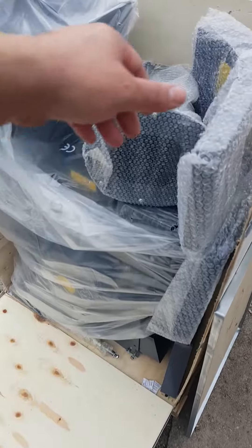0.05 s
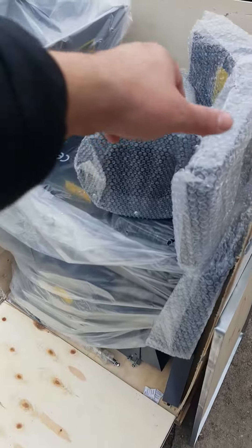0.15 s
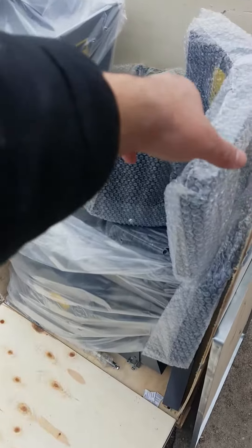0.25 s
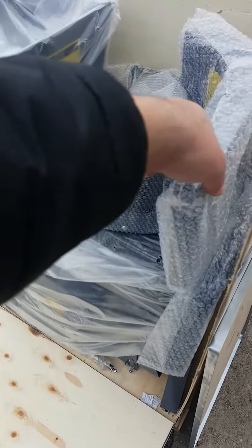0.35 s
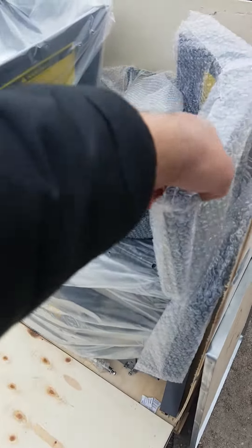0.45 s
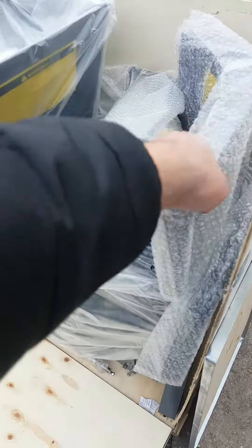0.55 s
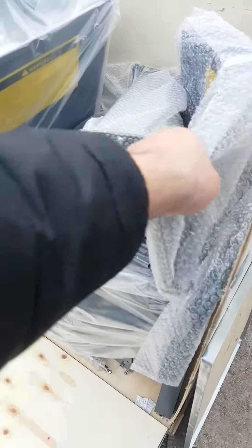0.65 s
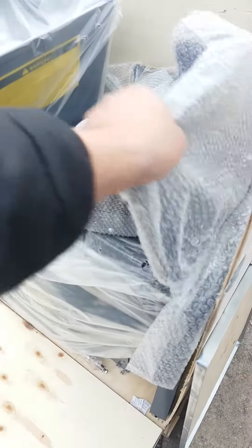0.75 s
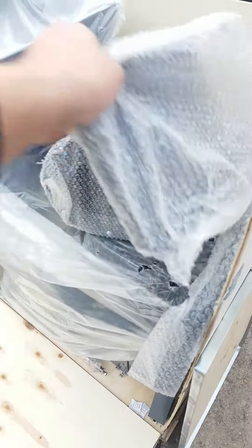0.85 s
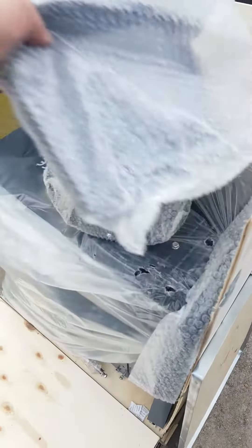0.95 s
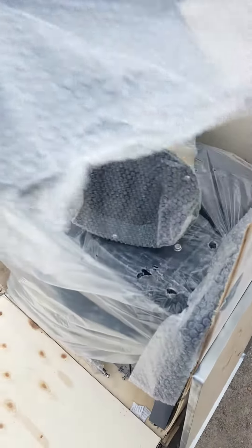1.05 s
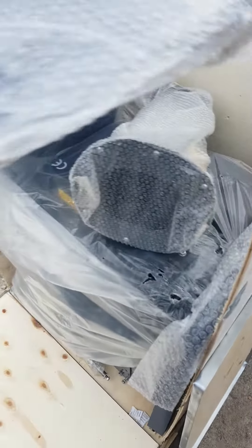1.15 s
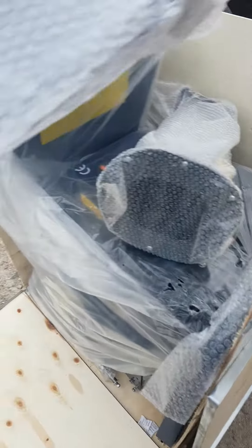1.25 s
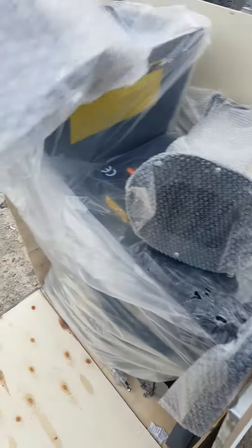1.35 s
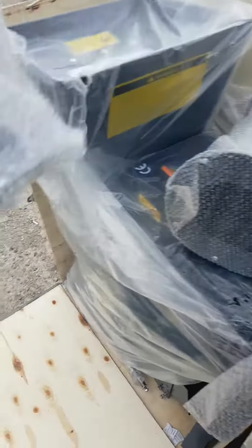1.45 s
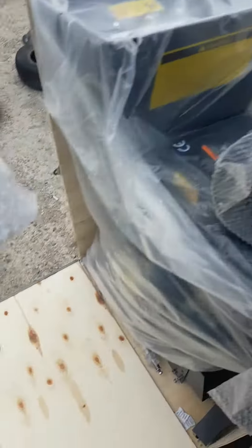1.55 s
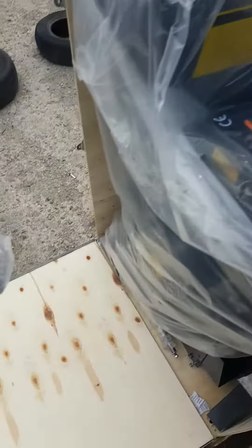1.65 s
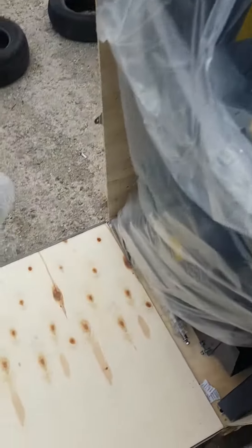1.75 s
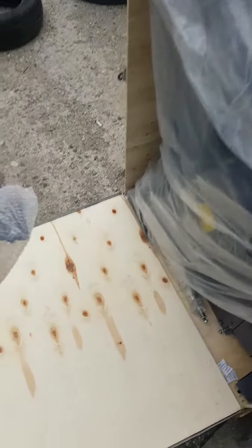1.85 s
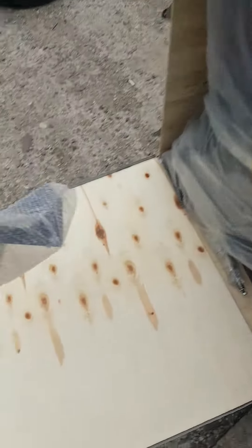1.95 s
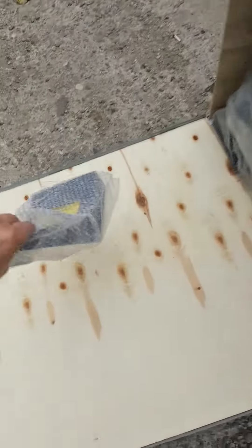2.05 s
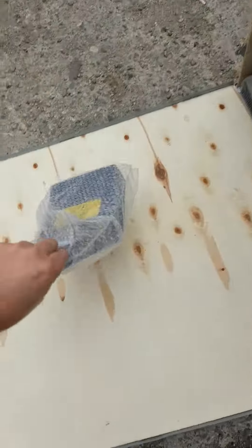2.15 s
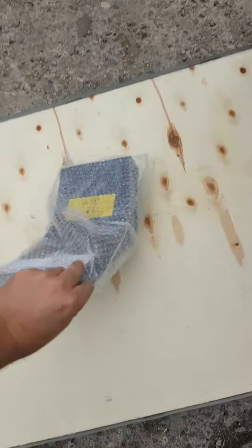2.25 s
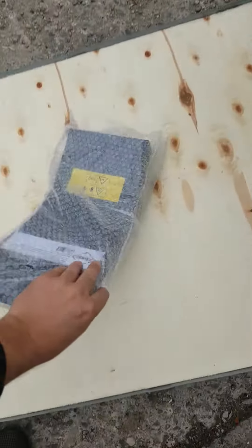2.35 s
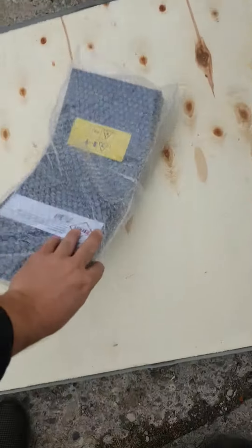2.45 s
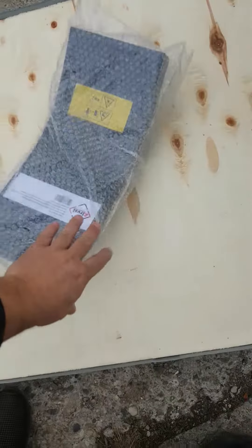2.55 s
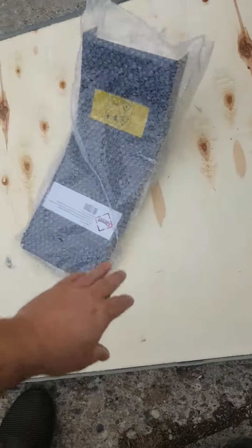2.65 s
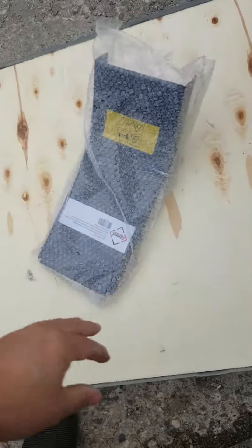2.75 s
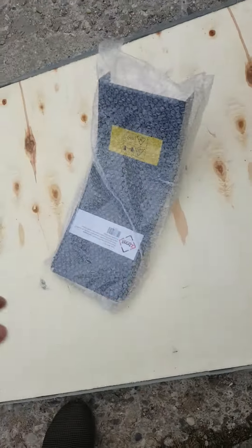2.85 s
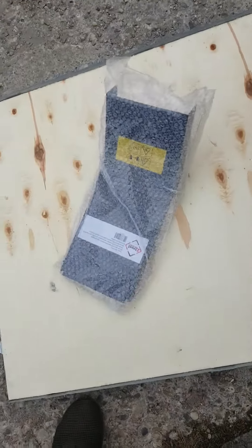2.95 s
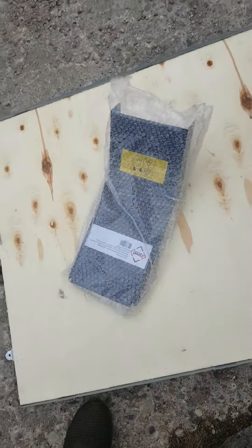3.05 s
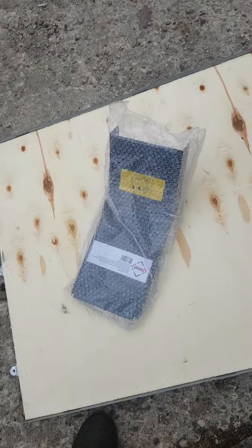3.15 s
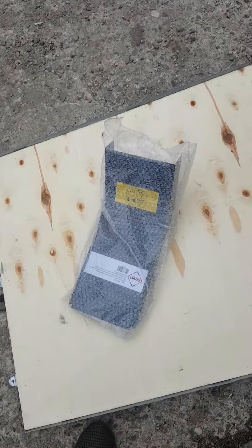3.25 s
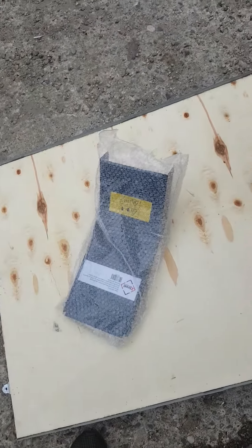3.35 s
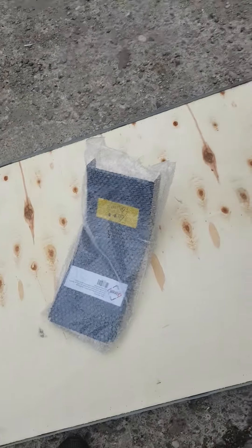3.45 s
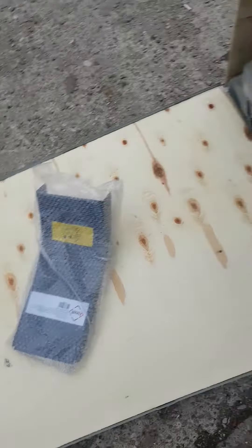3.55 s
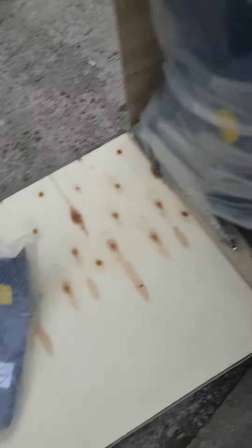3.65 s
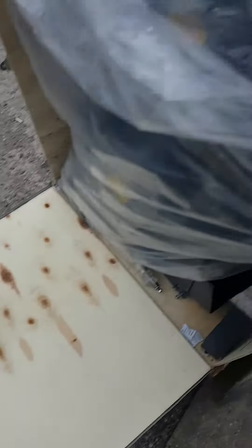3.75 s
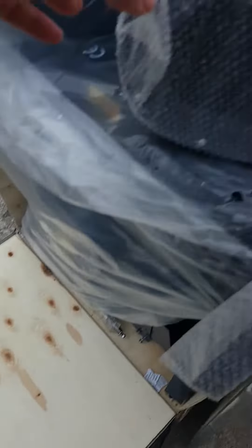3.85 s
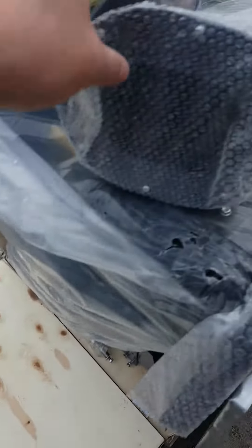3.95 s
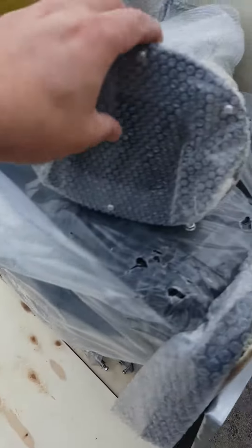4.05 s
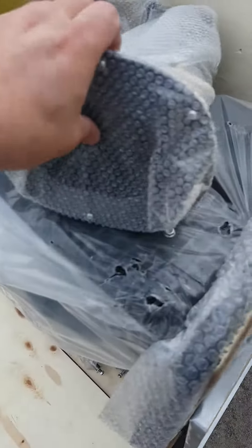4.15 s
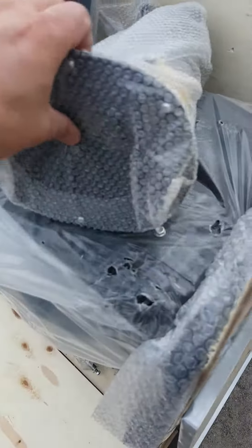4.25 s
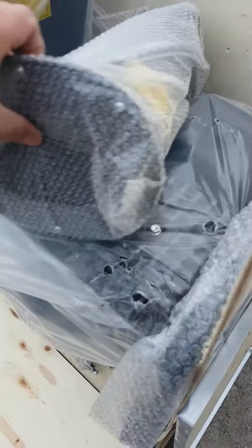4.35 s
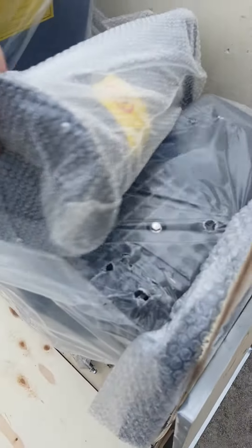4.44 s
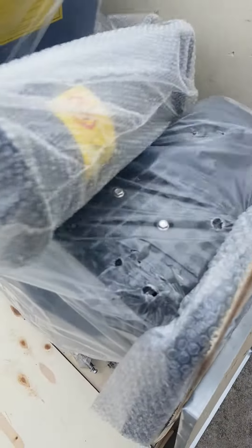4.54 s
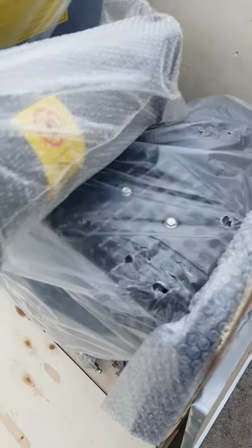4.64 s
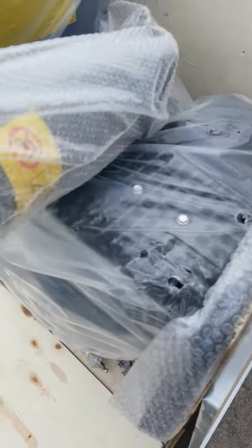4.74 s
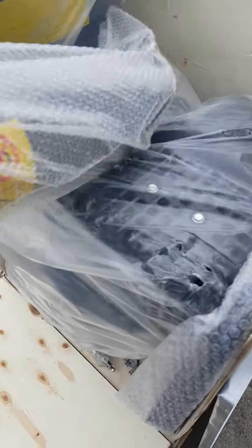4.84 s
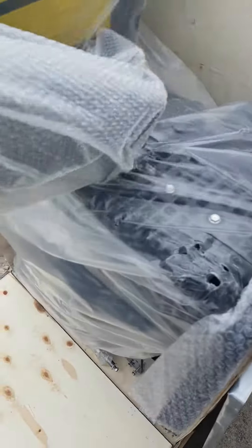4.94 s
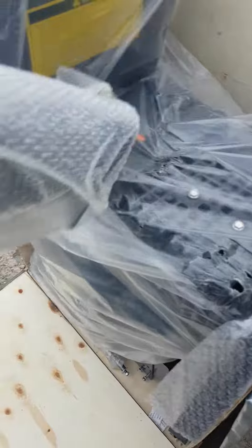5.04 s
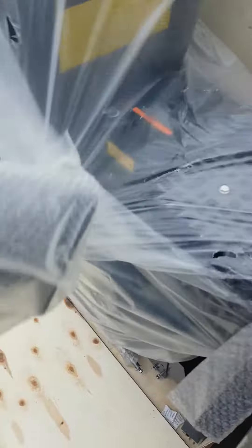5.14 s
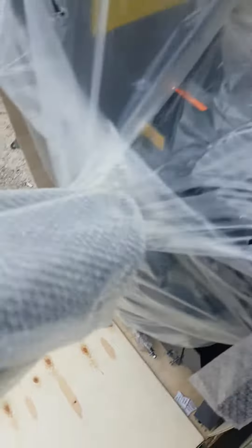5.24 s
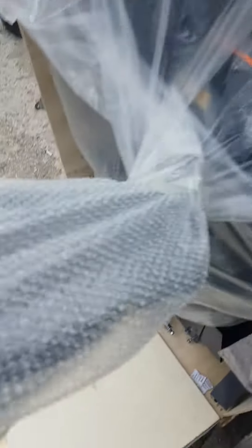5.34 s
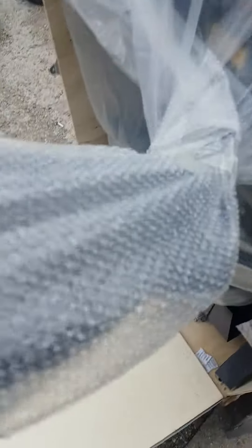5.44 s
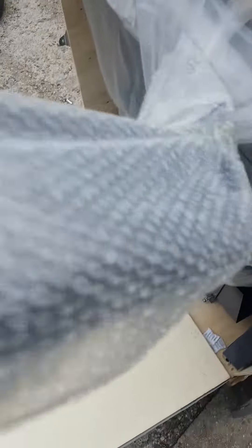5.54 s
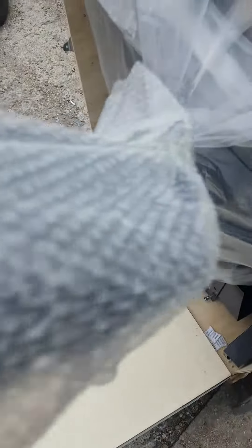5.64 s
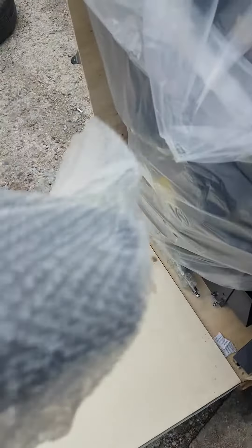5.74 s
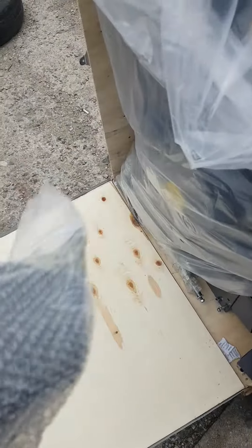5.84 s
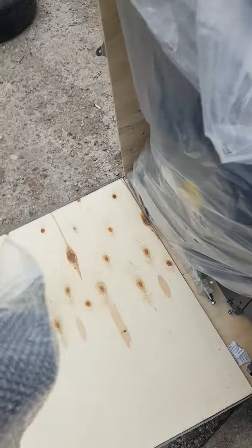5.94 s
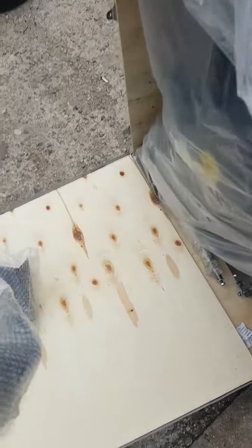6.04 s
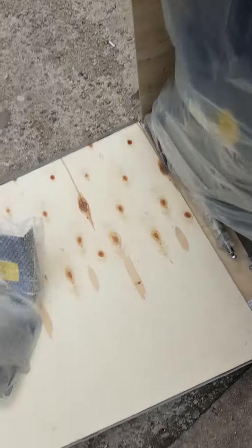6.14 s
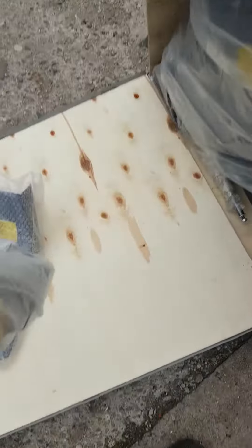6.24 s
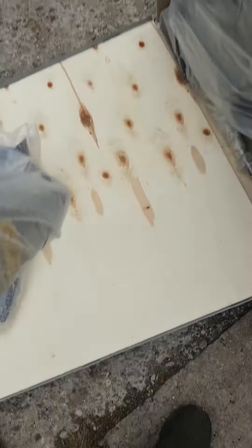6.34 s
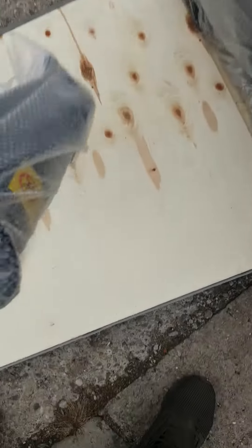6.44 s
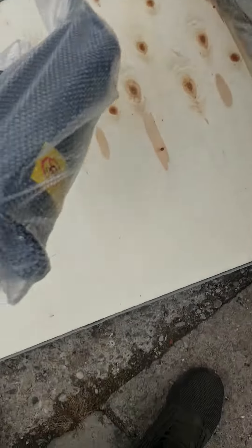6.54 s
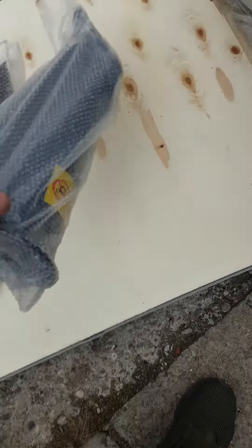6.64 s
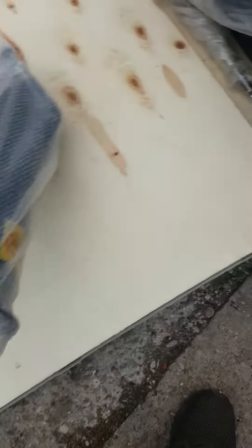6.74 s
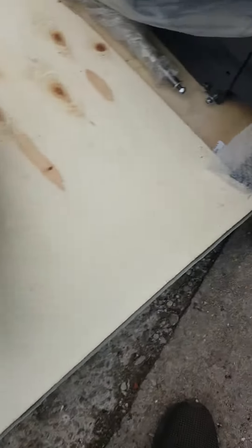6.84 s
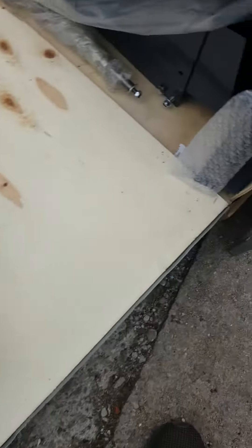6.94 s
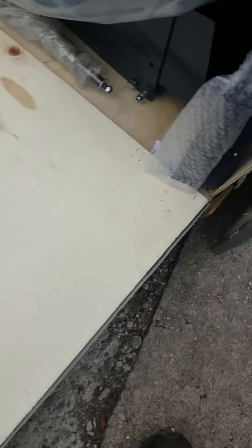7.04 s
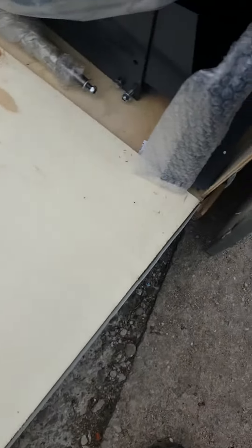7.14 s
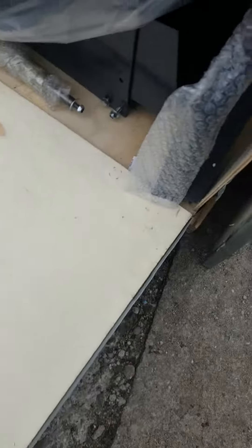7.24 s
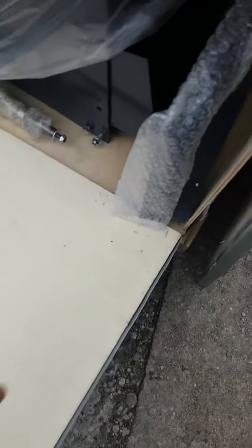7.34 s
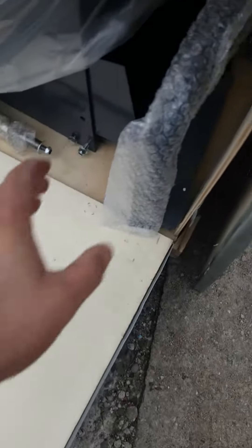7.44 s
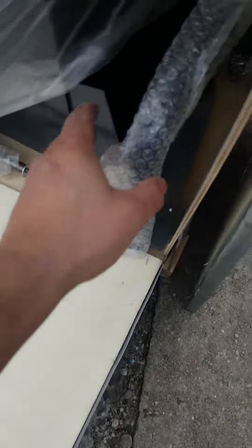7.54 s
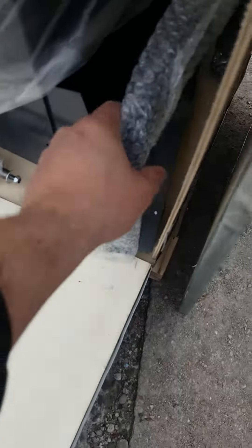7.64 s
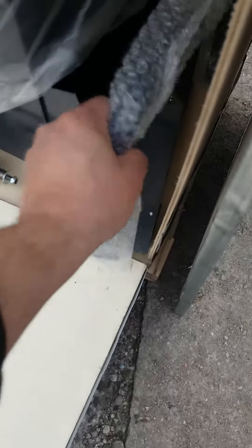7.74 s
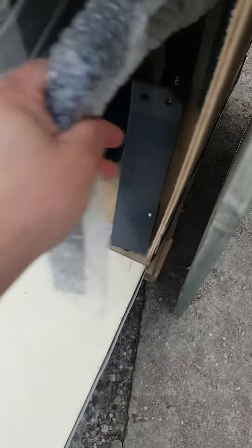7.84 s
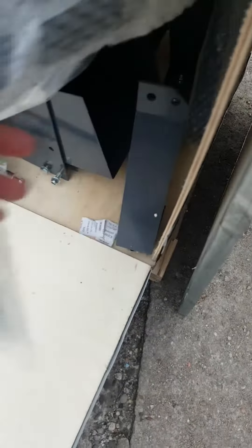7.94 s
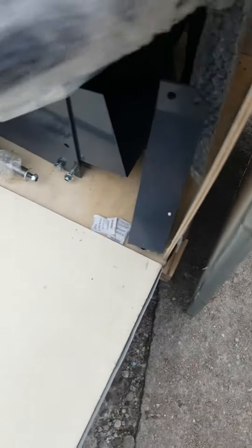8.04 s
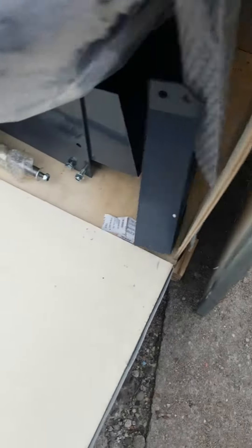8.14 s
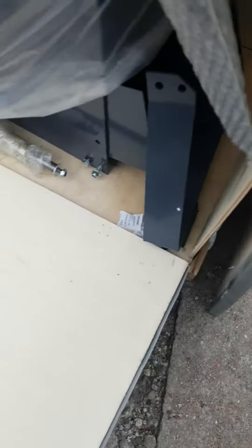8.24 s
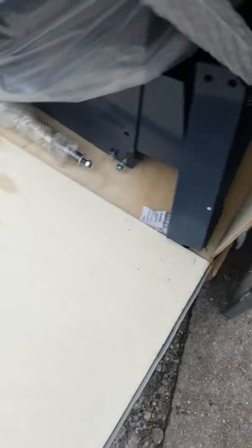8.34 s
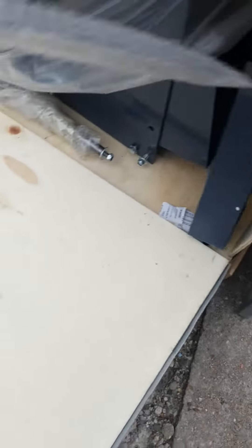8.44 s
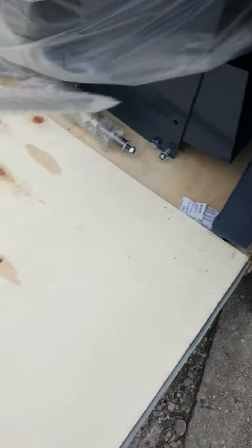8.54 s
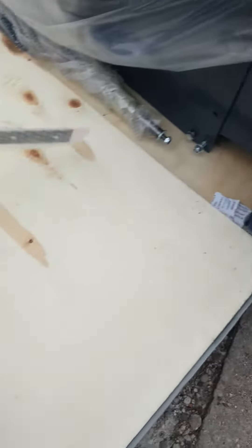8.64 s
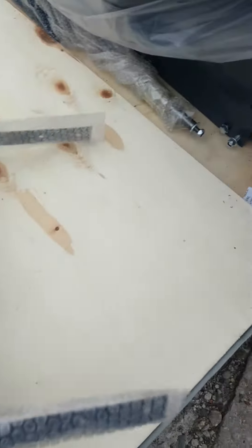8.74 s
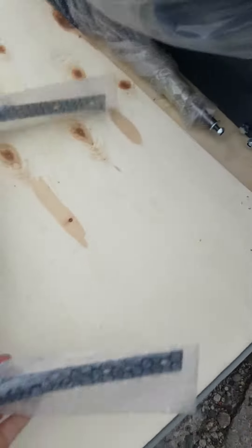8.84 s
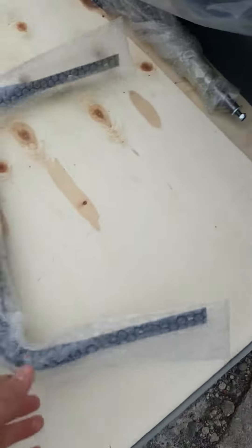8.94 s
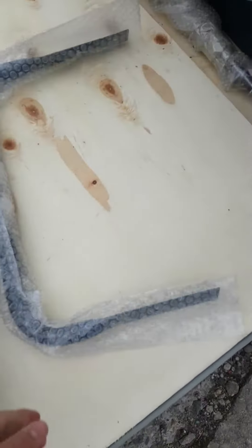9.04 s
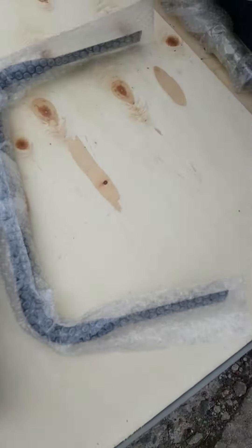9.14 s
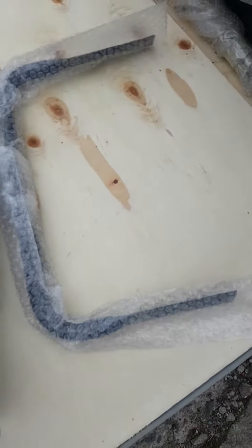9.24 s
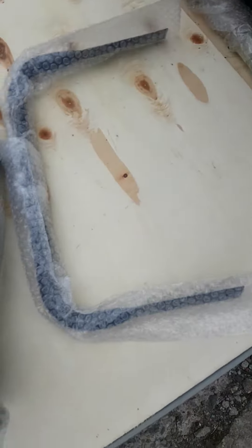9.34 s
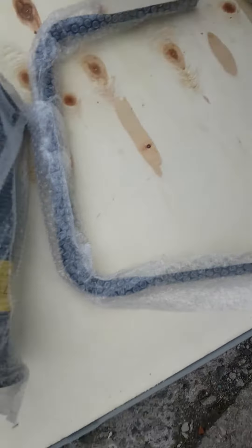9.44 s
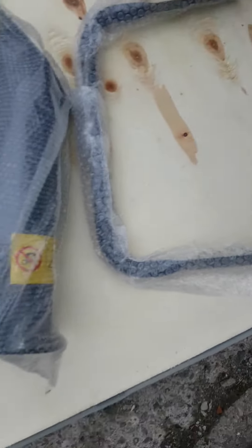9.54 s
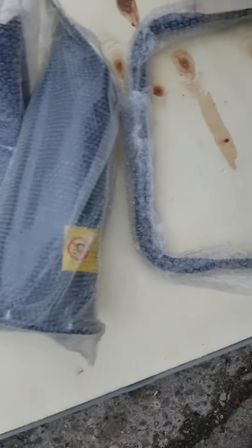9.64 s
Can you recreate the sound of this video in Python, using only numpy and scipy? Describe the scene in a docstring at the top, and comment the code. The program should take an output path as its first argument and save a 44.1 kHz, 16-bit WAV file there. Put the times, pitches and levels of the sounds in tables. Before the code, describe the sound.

Plastic film hisses and crackles as wrapped metal pieces are dragged free and set down in clustered, boomy wooden thuds, with short clanks.

```python
"""Steel machine parts in bubble wrap are pulled out of a crate lined with plastic sheeting and laid on its
plywood lid. Light knocks and sharp clicks open over a faint noise background; air brushes the swinging
microphone now and then. Heavier landings follow in groups: modes of the lid boom, and filtered noise bursts
crunch, crack and rustle as film. Bare steel rings as decaying sines: a plate, a hollow housing, a bracket, a
tube frame, last a bent handle. The crate wall booms with the housing and again with the handle."""
import sys
import numpy as np
from scipy import signal
from scipy.fft import rfft, irfft, next_fast_len
from scipy.io import wavfile

SR = 44100
rng = np.random.default_rng(int(sys.argv[2]) if len(sys.argv) > 2 else 0)


def dump_mix(stems):
    """Bounce the given channels to the path in sys.argv[1] as a 16-bit WAV at rate SR."""
    frames = np.atleast_2d(stems).T  # one column per channel
    limited = np.clip(frames, -1, 1)  # hard clip at full scale
    pcm = np.round(limited * 32767).astype(np.int16)
    wavfile.write(sys.argv[1], SR, pcm)


N = 427329

# landings on the lid: (time [s], strength [dB], hardness [dB], change per rebound [dB], note of the spot [Hz])
LANDINGS = [(0.004, -20, -10.5, -3.5, 267), (0.195, -16, -9, 0, 290), (0.429, -16.5, -11.5, -4.5, 290),
            (0.579, -23, -10.5, -5.5, 330), (0.722, -24.5, -10.5, -3, 440), (2.254, -0.5, -16, -14, 214),
            (2.29, -8, -9.5, -3.5, 240), (2.42, -1.5, -9, -7.5, 304), (2.532, -15, -9.5, 0.5, 280),
            (2.717, -6.5, -0.5, -5.5, 402), (2.759, -7.5, -10, -3.5, 272), (2.868, -14.5, -9.5, -29, 429),
            (2.999, -19.5, -8.5, -14, 258), (4.578, -5.5, -4.5, -3, 237), (4.701, -4, -6.5, -5, 270),
            (4.787, -10.5, -7.5, -2.5, 222), (4.884, -11.5, -1, 0, 225), (6.157, -17.5, -7, -20.5, 396),
            (6.358, -18, 1, -15, 518), (6.377, -17, -11.5, -3.5, 317), (6.449, -3, -5.5, -2, 277),
            (6.561, -5.5, -3.5, -31, 524), (6.752, -2.5, -11.5, -1.5, 576), (6.803, -6, -10, -2, 224),
            (6.952, -11.5, -8.5, -6, 251), (7.006, -3.5, -8.5, -9.5, 264), (7.07, -4.5, -10, 0, 247),
            (7.135, -13, -3, -3, 580), (7.241, -7.5, -11, -7, 220), (7.817, -22.5, -7.5, -3, 316),
            (7.871, -16, -9, -12, 376), (8.146, -15.5, -7.5, 4.5, 259), (8.246, -11, -12.5, -5, 238),
            (8.744, 1.5, -15, -4, 267.5), (8.953, -11, -12, -26, 290), (9.024, 2.5, -9.5, -10, 213)]
# rustle colour: (frequency [Hz], level [dB per Hz, relative])
FILM_COLOUR = [(180, -49), (300, 4), (326, -8), (546, 0), (774, -1), (1460, -5), (2400, -1), (5430, -15),
               (7950, -38.5), (13500, -26), (16000, -32)]
# film stereo image: (frequency [Hz], left-right difference [dB])
FILM_BALANCE = [(300, 3), (2500, -1), (4500, 5.5), (8000, 12.5), (14000, 13)]


def from_db(db):
    """Decibels to amplitude gain."""
    return 10 ** (np.asarray(db) / 20)


def rms_one(x):
    """Scale to rms 1."""
    return x / np.sqrt(np.mean(x ** 2) + 1e-20)


def in_time(rows):
    """Interpolate a (time [s], value) table at every sample."""
    return np.interp(np.arange(N) / SR, *np.transpose(rows))


def at_hz(points, hz):
    """Read a table on a log-frequency axis."""
    f, value = np.transpose(points)
    return np.interp(np.log(np.maximum(hz, 1)), np.log(f), value)


def near_db(hz, spot_hz, db_per_octave, depth_db):
    """A contact favours modes near its own note; the rest are weaker by up to the depth."""
    octaves = np.abs(np.log2(hz / spot_hz))
    return -np.minimum(db_per_octave * octaves, depth_db)


def drift(rate_hz, size=N):
    """Slow random curve of rms 1, with straight lines between knots."""
    knots = rng.standard_normal(int(rate_hz * size / SR) + 2)
    return rms_one(np.interp(np.arange(size) * rate_hz / SR, np.arange(len(knots)), knots))


def add(out, s, sound):
    """Mix a stereo sound in at time s; it mostly reaches the left microphone a little earlier."""
    lag_s = rng.normal(.00018, .0002)
    for channel, start_s in enumerate([s, s + lag_s]):
        i = max(round(start_s * SR), 0)
        out[channel, i:i + sound.shape[1]] += sound[channel, :N - i]


def panned(db):
    """Left and right gains for a left-right level difference."""
    return from_db(np.array([[.5], [-.5]]) * db)


def paired(two, hz):
    """Two unrelated draws become left and right, alike in the bass."""
    # (frequency [Hz], left-right correlation)
    likeness = [(150, 0.96), (280, 0.97), (520, 0.77), (1000, 0.14), (2200, 0.038), (8000, 0.068)]
    alike = np.clip(at_hz(likeness, hz), -1, 1)
    mid = np.sqrt((1 + alike) / 2) * two[0]
    side = np.sqrt((1 - alike) / 2) * two[1]
    return np.array([mid + side, mid - side])


def coloured(two, spectrum, balance=None):
    """Causal (minimum-phase) stereo filter of unit power gain before any left-right balance."""
    size = 2 * next_fast_len(two.shape[-1] // 2 + 1024)
    hz = np.arange(size // 2 + 1) * SR / size
    cepstrum = irfft(np.log(rms_one(from_db(at_hz(spectrum, hz)))))
    # folding the cepstrum onto positive times gives minimum phase
    fold = np.r_[1, np.full(size // 2 - 1, 2), 1, np.zeros(size // 2 - 1)]
    response = np.exp(rfft(cepstrum * fold))
    if balance is not None:
        response = response * panned(at_hz(balance, hz))
    return irfft(paired(rfft(two, size), hz) * response)[:, :two.shape[-1]]


def burst(t60_s, tail_db, tail_t60_s):
    """Stereo noise that dies fast, plus a slower, weaker tail."""
    t = np.arange(SR // 2) / SR
    envelope = from_db(-60 * t / t60_s) + from_db(tail_db - 60 * t / tail_t60_s)
    return rng.standard_normal((2, len(t))) * envelope


def background():
    """Smooth faint noise under everything, with a slowly changing level."""
    # (time [s], level [dB, before the offset below])
    level = [(0, -45.5), (2.2, -47.5), (3.2, -54.5), (4.2, -48), (6.2, -49.5), (7.5, -60), (8.6, -49),
             (9.35, -65.5), (9.69, -64.5)]
    # (frequency [Hz], level [dB per Hz, relative])
    colour = [(88, -20.5), (150, -4), (283, -2.5), (465, -8.5), (2060, -13), (3630, -22), (9000, -48),
              (12000, -100)]
    offset_db = 1.0
    return coloured(from_db(in_time(level) + offset_db) * rng.standard_normal((2, N)), colour)


def wind(still_air_db=-54.5):
    """Low noise of air brushing the microphone, rising and falling as it is swung about."""
    # (middle [s], half-width to 1/e power [s], level [dB])
    swings = [(1.15, 0.42, -45), (1.9, 0.46, -40.5), (3.75, 0.13, -44), (7.07, 0.29, -35.5),
              (8.299, 0.39, -36.5), (8.92, 0.15, -28)]
    # (frequency [Hz], level [dB per Hz, relative])
    colour = [(20, -27.5), (45, -1.5), (80, 5), (130, -0.5), (250, -14), (500, -66)]
    t = np.arange(N) / SR
    power = np.full(N, from_db(still_air_db) ** 2)
    for middle_s, width_s, db in swings:
        power += from_db(db) ** 2 * np.exp(-((t - middle_s) / width_s) ** 2)
    gusts_db = 1.2 * drift(14)
    return coloured(np.sqrt(power) * from_db(gusts_db) * rng.standard_normal((2, N)), colour)


def sliding(restless_db=-82, grip_s=0.017, settle_db_per_s=120):
    """Friction strength and gain of its top octave: each pull grips, swells or eases, and settles."""
    # (time [s], length [s], level [dB, relative], swell [dB], sheen of the top octave [dB])
    pulls = [(0.374, 0.45, -56, 2.5, -2), (0.731, 0.49, -56, -23.5, 4.5), (1.122, 0.48, -64.5, -6, 3),
             (1.497, 0.052, -56, -5, 5), (1.604, 0.57, -65.5, 14, 3), (2.24, 0.64, -50.5, -1, -2.5),
             (3.297, 0.63, -77, 12, 6), (4.039, 0.95, -53.5, 8.5, 4.5), (5.098, 1.394, -50, 2, 6),
             (6.757, 0.5, -53.5, -4.5, -14), (7.3, 0.27, -66, 0, -5), (7.637, 0.39, -54, 17.5, 6.5),
             (8.137, 0.14, -40.5, -20.5, 0), (8.289, 0.69, -57, 13, 8), (8.686, 0.23, -49, 16, 0)]
    t = np.arange(N) / SR
    power = np.full(N, from_db(restless_db) ** 2)  # film stirring between the pulls
    top_power = power.copy()
    for s, length_s, db, swell_db, sheen_db in pulls:
        first = max(int(s * SR), 0)
        age = t[:N - first]
        swell = swell_db * (np.minimum(age / length_s, 1) - .5)
        settling = settle_db_per_s * np.maximum(age - length_s, 0)
        pull = (np.minimum(age / grip_s, 1) * from_db(db + swell - settling)) ** 2
        power[first:] += pull
        top_power[first:] += pull * from_db(sheen_db) ** 2
    return np.sqrt(power), np.sqrt(top_power / power)


def rustle(level_db=12.0, creases_per_s=1800, size_db=3.0, clump_db=6.0, sheen_hz=8000):
    """Film sliding over film hisses, and tiny creases pop in clumps."""
    # (time [s], left-right difference [dB])
    place = [(1, 1), (2, -2), (4.2, 1), (6.4, 2), (7.5, -2), (7.9, 1)]
    born = rng.random(N) < creases_per_s * from_db(clump_db * drift(25)) / SR
    sizes = from_db(size_db * np.minimum(rng.exponential(1, N), 4))
    pops = rms_one(born * sizes * rng.standard_normal((2, N)))
    hiss = rng.standard_normal((2, N))
    strength, sheen = sliding()
    film = coloured(rms_one(pops + hiss) * strength * from_db(level_db), FILM_COLOUR, FILM_BALANCE)
    top = signal.sosfiltfilt(signal.butter(2, sheen_hz, "high", fs=SR, output="sos"), film)
    return (film + (sheen - 1) * top) * panned(in_time(place))


def rubs(slips_per_s=900, hiss=0.12):
    """Parts and film stick and slip over edges; uneven slips drive a resonance of film or wood."""
    # (time [s], length [s], level [dB], pitch [Hz], nominal width [Hz])
    drags = [(0.03, 0.21, -38.5, 295, 160), (0.249, 0.42, -31.5, 350, 219), (0.753, 0.059, -29, 2600, 600),
             (5.126, 0.11, -29, 2960, 2530), (5.143, 0.083, -28.5, 830, 900), (6.133, 0.23, -41, 3020, 400),
             (6.534, 0.031, -21.5, 3040, 500), (6.666, 0.047, -44, 3960, 249),
             (9.43, 0.12, -62, 2775, 1200)]
    out = np.zeros((2, N))
    for s, length_s, db, hz, width_hz in drags:
        pull = signal.windows.tukey(int(length_s * SR), .8)
        slips = (rng.random(SR) < slips_per_s / SR) + hiss
        edge = np.exp(width_hz / hz / 2)
        band = signal.butter(1, [hz / edge, hz * edge], "band", fs=SR, output="sos")
        dull = signal.butter(2, min(2 * hz, 4800), fs=SR, output="sos")
        squeak = signal.sosfilt(np.vstack([band, dull]), slips * rng.standard_normal((2, SR)))
        add(out, s, from_db(db) * pull * rms_one(squeak[:, :len(pull)]))
    return out * panned(2.1)


def snaps(level_db=2.0):
    """Short clicks with a broad dry crack and a ring near 2 kHz, each a little different in colour."""
    # (time [s], level [dB, relative])
    clicks = [(0.187, -29), (0.2403, -30), (0.361, -39.5), (0.418, -30.5), (0.4584, -38), (0.4892, -41),
              (0.577, -38), (0.7554, -31.5), (1.3554, -39.5), (1.3997, -36.5), (2.423, -31), (2.5855, -28),
              (2.672, -38.5), (2.998, -38.5), (4.554, -31), (7.945, -38), (7.994, -34.5), (8.038, -34)]
    # (frequency [Hz], level [dB per Hz, relative])
    mean_colour = [(500, -10.5), (1600, -8), (2020, 7), (2350, -9), (3400, -5.5), (6000, -26.5),
                   (8500, -47.5), (12000, -32), (16000, -41.5)]
    out = np.zeros((2, N))
    for s, db in clicks:
        colour = [(hz, level + rng.uniform(-2.5, 2.5)) for hz, level in mean_colour]
        crack = from_db(db + level_db) * burst(t60_s=0.054, tail_db=-3.5, tail_t60_s=0.14)
        add(out, s, coloured(crack, colour, FILM_BALANCE))
    return out


def cracks():
    """Hard edges and bursting bubbles give noise cracks of a few milliseconds."""
    # (time [s], level [dB], left-right difference [dB])
    bursts = [(0.755, -20, -5), (1.398, -26, -12), (2.72, -17.5, 0.5), (4.309, -21.5, -5), (4.707, -17, -4),
              (5.639, -15.5, -4.5), (6.449, -13, -3.5), (6.466, -7.5, -4), (6.561, -15, -4.5),
              (6.774, -18, 1), (7.022, -20.5, 4), (8.146, -15, 2), (9.024, -8, 3)]
    # (frequency [Hz], level [dB per Hz, relative])
    colour = [(300, -6.5), (1200, 5.5), (3500, 0.5), (6000, -18.5), (8500, -33.5), (12000, -23),
              (16000, -34)]
    out = np.zeros((2, N))
    for s, db, pan_db in bursts:
        add(out, s, from_db(db) * panned(pan_db) * burst(t60_s=0.01, tail_db=-19.5, tail_t60_s=0.16))
    return coloured(out, colour, FILM_BALANCE)


def touches(rebounds=2, rebound_s=.026, padding_db=-8.5):
    """Landings and their rebounds, none stronger than the last: (s, boom dB, body dB, clack dB, note Hz)."""
    rows = []
    for s, db, hardness_db, rebound_db, hz in LANDINGS:
        for k in range(rebounds + 1):
            boom_db = db + k * min(rebound_db, 0)
            body_db = boom_db + hardness_db
            clack_db = body_db + padding_db  # the wrap softens the clack
            rows.append((s + k * rebound_s, boom_db, body_db, clack_db, hz))
    return rows


def crunches(level_db=-19.5, pinch_db=-13.0):
    """Wrap crushed between steel and wood, or pinched on bare edges, gives a run of tiny snaps."""
    # (time [s], level [dB, relative])
    pinches = [(2.255, -14), (2.288, -13.5), (2.441, -12.5), (4.582, -14.5), (4.706, -23), (4.904, -21),
               (6.37, -15), (6.752, -31), (6.773, -21.5), (7.068, -21), (7.098, -23.5), (7.134, -23.5),
               (7.241, -33.5), (7.787, -25), (8.146, -10), (8.206, -18), (8.245, -11.5)]
    out = np.zeros((2, N))
    crushes = [(s, clack_db + level_db) for s, _, _, clack_db, _ in touches()]
    crushes += [(s, db + pinch_db) for s, db in pinches]
    for s, db in crushes:
        grain = rms_one(from_db(4.2 * drift(400, size=SR // 2)))
        add(out, s, from_db(db) * grain * burst(t60_s=0.042, tail_db=-1.5, tail_t60_s=0.45))
    return coloured(out, FILM_COLOUR, FILM_BALANCE)


def struck(hits, modes, load_shift, chatter=0.54, chatter_per_s=90, spread_db=3.0,
           focus_db_per_octave=30, focus_db=10.0):
    """Modes ring in a new mix at each touch; the support detunes them and chatter makes them waver."""
    out, t = np.zeros((2, N)), np.arange(SR) / SR
    hz, mode_db, t60_s = np.transpose(modes)
    fade = from_db(-60 * np.outer(1 / t60_s, t))
    for s, db, spot_hz in hits:
        loaded_hz = hz * (1 + load_shift * rng.uniform(-1, 1, len(hz)))
        rings = fade * np.sin(2 * np.pi * np.outer(loaded_hz, t))
        turn = rng.uniform(0, 2 * np.pi, len(hz))
        strengths = paired([np.sign(np.cos(turn)), np.sqrt(2) * np.sin(turn)], hz)
        waver = 1 + chatter * np.array([drift(chatter_per_s, size=SR) for _ in hz])
        focus = near_db(hz, spot_hz, focus_db_per_octave, focus_db)
        mix_db = mode_db + focus + spread_db * rng.standard_normal(len(hz))
        add(out, s, strengths * from_db(db + mix_db) @ (rings * waver))
    return out


def crate_wall():
    """The crate's side wall booms in a few low modes when bumped."""
    # contacts: (time [s], level [dB], favoured frequency [Hz])
    hits = [(4.6, -20, 119), (8.17, -15, 222), (8.25, -20, 135), (9.03, -29, 126)]
    # modes: (frequency [Hz], level [dB], t60 [s])
    modes = [(118, -3, .35), (134.6, 2, .9), (222, -11, .4)]
    return struck(hits, modes, load_shift=0, chatter=0)


def steel_parts():
    """Five steel parts, each a set of decaying modes, ring where bare metal touches."""
    # hits: (time [s], level [dB], favoured frequency [Hz]); modes: (frequency [Hz], level [dB], t60 [s])
    # flat plate
    plate_hits = [(2.265, -18.5, 2380), (2.304, -16.5, 2020), (2.425, -16.5, 1830), (2.72, -29.5, 2690),
                  (2.76, -12.5, 655)]
    plate_modes = [(654, -3, 0.4), (1780, -4, 0.2), (2000, -5.5, 0.29), (2380, 0, 0.17), (2690, -9, 0.39)]
    # hollow housing
    housing_hits = [(4.578, -19, 530), (4.701, -24, 730), (4.885, -29, 615), (5.17, -39, 810),
                    (5.66, -35, 1130)]
    housing_modes = [(275, 6, .5), (405, 0, 0.3), (526, 0, 0.6), (614, -7, 1.2), (732, -3, 0.9),
                     (807, -7, 0.9), (1045, -2, .35), (1130, -1, .4), (1236, -1, 0.4)]
    # bracket
    bracket_hits = [(6.372, -19, 3830), (6.394, -27, 2130), (6.466, -20.5, 3750), (6.54, -18, 3000),
                    (6.562, -25, 2180)]
    bracket_modes = [(2135, 1, 0.36), (2880, -3, 0.24), (3330, -5, 0.12), (3720, -5, 0.15),
                     (4670, -9, 0.14)]
    # tube frame
    frame_hits = [(7.098, -23.5, 850), (7.135, -25, 1660), (7.243, -34, 3230)]
    frame_modes = [(859, 3.5, 0.3), (1290, 3, 0.28), (1640, 1, 0.47), (2440, -10, 0.18), (3300, -9, 0.2),
                   (3730, 1, 0.2)]
    # bent handle
    handle_hits = [(8.146, -18, 1850), (8.206, -28, 2130), (8.245, -24, 3725), (8.266, -24, 3390),
                   (8.279, -23, 2820), (9.024, -28, 1520)]
    handle_modes = [(1523, -13, 0.55), (1850, -1, 0.2), (2040, -3, 0.3), (2130, 0, 0.2), (2820, 1, 0.28),
                    (3385, -2, 0.13), (3725, -4, 0.12), (4050, -6, 0.12)]
    out = struck(housing_hits, housing_modes, load_shift=0)
    for hits, modes in [(plate_hits, plate_modes), (bracket_hits, bracket_modes),
                        (frame_hits, frame_modes), (handle_hits, handle_modes)]:
        out += struck(hits, modes, load_shift=.005)
    return out


def thumps(level_db=-8.0, t60_s=0.13):
    """The wood right under a landing part bends first and gives the spot's note, a decaying sine."""
    out, t = np.zeros((2, N)), np.arange(SR // 2) / SR
    for s, db, _, _, hz in LANDINGS:
        note = np.sin(2 * np.pi * hz * t) * from_db(db + level_db - 60 * t / t60_s)
        add(out, s, np.ones((2, 1)) * note)
    return out


def plywood(level_db=-11.0, deep_db=-1.0, body_db=-3.0, clack_db=9.0, spread_db=3.5,
            attack=0.25, attack_s=0.0058, count=300):
    """Every touch rings the same crowd of plate modes, with strengths set by where and how hard it strikes."""
    # (frequency [Hz], response [dB per Hz, relative])
    lid_response = [(60, -33), (100, -18.5), (135, -6.5), (165, -13), (212, 0.5), (272, 1), (330, -3.5),
                    (410, 2), (560, 5.5), (950, -1.5), (1500, -11), (2800, -17), (4500, -27), (7500, -64)]
    # (frequency [Hz], nominal t60 [s])
    lid_t60 = [(100, 0.75), (260, 0.39), (700, 0.3), (1840, 0.28), (4850, 0.22)]
    order = np.arange(count)
    hz = 200 * 36 ** ((order + rng.random(count)) / count) - 130  # 70 to 7070 Hz
    share = np.sqrt((hz + 130) / 2300)  # sparser modes carry more each
    t = np.arange(int(.55 * SR), dtype=np.float32) / SR
    # some high modes are damped by the load, others sing on
    unevenness = np.interp(hz, [400, 1200], [.3, 1])
    t60_s = at_hz(lid_t60, hz) * np.exp(unevenness * rng.uniform(-.5, .25, count))
    decay = (np.log(1000) / t60_s).astype(np.float32)
    waves = np.sin(np.outer((2 * np.pi * hz).astype(np.float32), t))
    modes = waves * np.exp(-np.outer(decay, t))
    direct = 1 + attack * np.exp(-t / attack_s)  # the first wave is strongest, before it spreads over the sheet
    out = np.zeros((2, N))
    for s, boom, body, clack, spot_hz in touches():
        # soft, heavy contacts reach the deepest modes
        deep = boom + deep_db + 0.77 * (boom - body - 8)
        contact_db = at_hz([(120, deep), (300, boom), (600, body + body_db), (1200, body + body_db),
                            (2000, clack + clack_db)], hz)
        # the struck spot favours whole clusters of neighbouring modes
        centres = order[::5]
        clusters_db = np.interp(order, centres, rng.uniform(-8, 6, len(centres)))
        spot_db = unevenness * (clusters_db + spread_db * rng.standard_normal(count))
        focus = near_db(hz, spot_hz, db_per_octave=12.5, depth_db=5.0)
        gain = share * from_db(level_db + contact_db + at_hz(lid_response, hz) + spot_db + focus)
        strengths = gain * paired(rng.choice([-1, 1], (2, count)), hz)
        add(out, s, direct * (strengths.astype(np.float32) @ modes))
    return out


def without_deep_bass(x, lowest_hz=90):
    """Deep bass is cut from the wood and steel sounds."""
    return signal.sosfilt(signal.butter(2, lowest_hz, "high", fs=SR, output="sos"), x + 1e-18)


def scene():
    """Air, film, steel and wood together."""
    air = background() + wind()
    film = rustle() + rubs() + snaps() + cracks() + crunches()
    wood = crate_wall() + thumps() + plywood()
    return air + film + without_deep_bass(steel_parts() * panned(3) + wood * panned(.8))


def record(dry, top=4.8, cutoff_hz=16200):
    """The loudest peaks are rounded and the top is cut."""
    rounded = top * np.tanh(dry / top)
    return signal.sosfilt(signal.ellip(10, .2, 80, cutoff_hz, fs=SR, output="sos"), rounded)


dry = scene()
out = record(dry)
dump_mix(out)
```